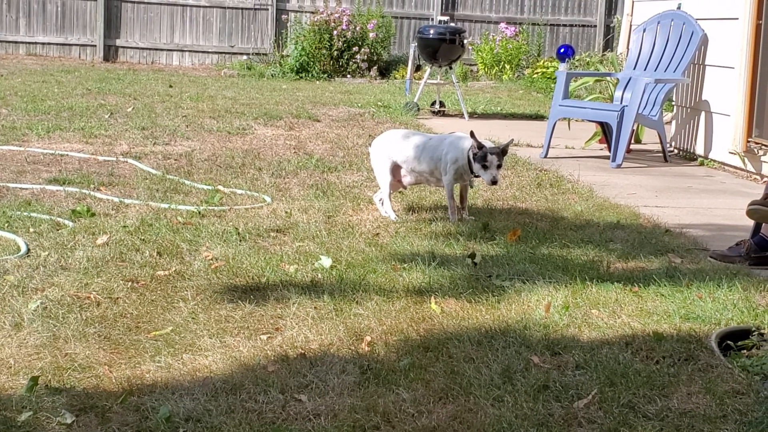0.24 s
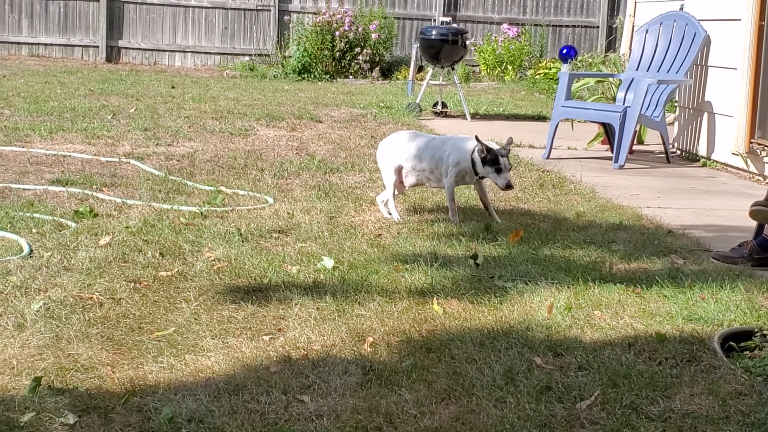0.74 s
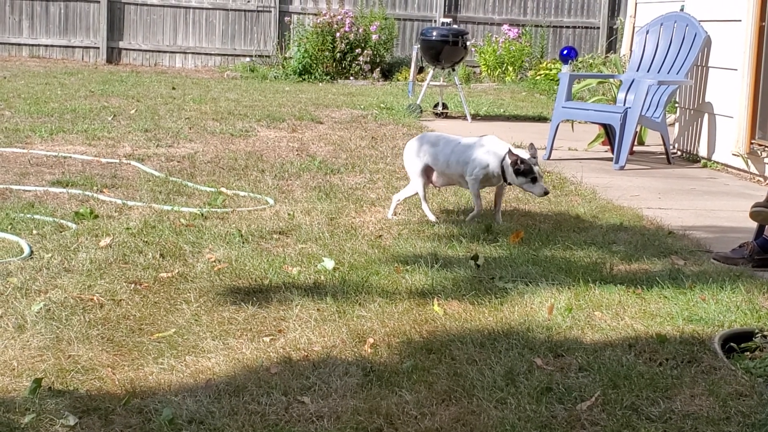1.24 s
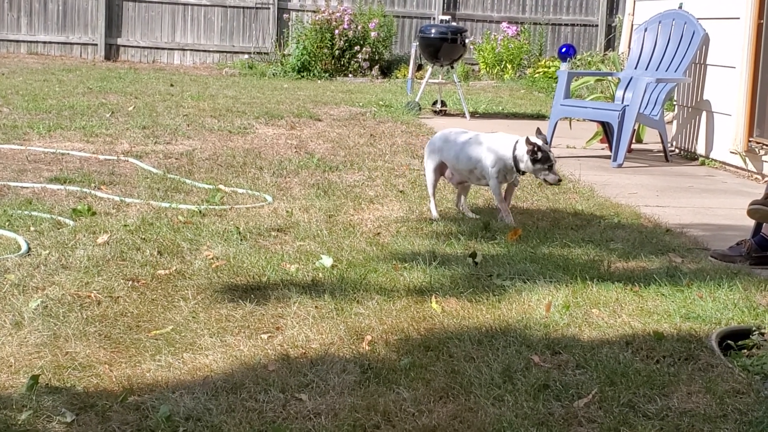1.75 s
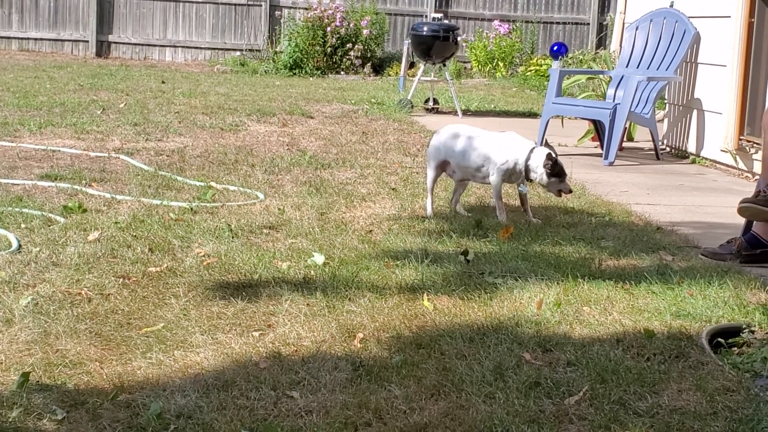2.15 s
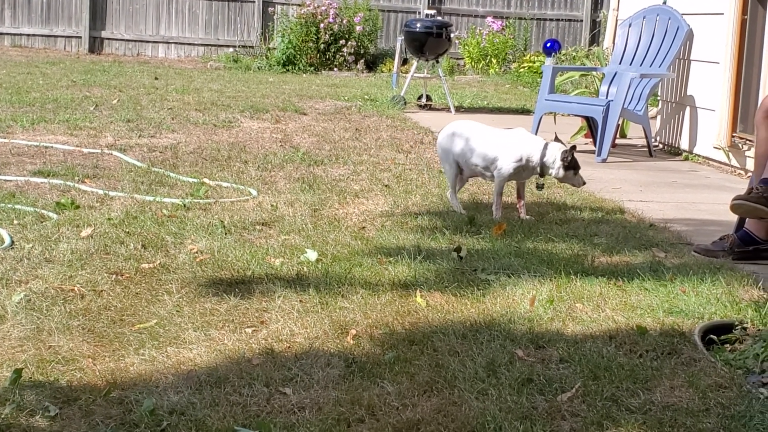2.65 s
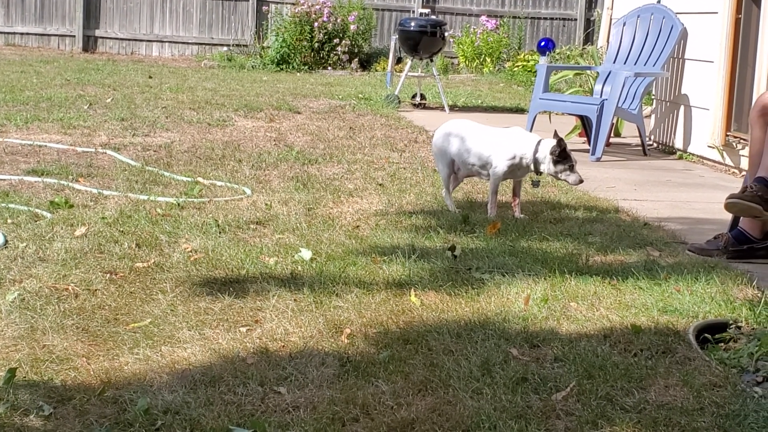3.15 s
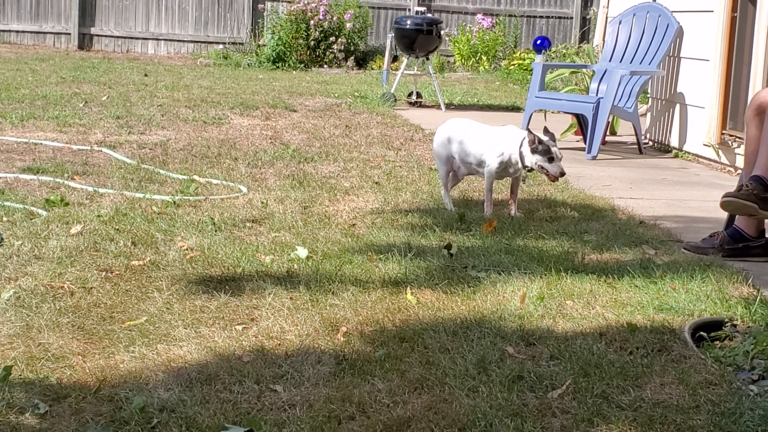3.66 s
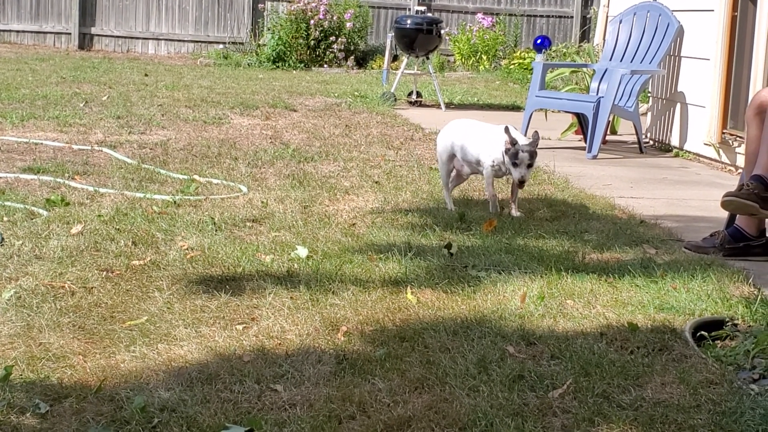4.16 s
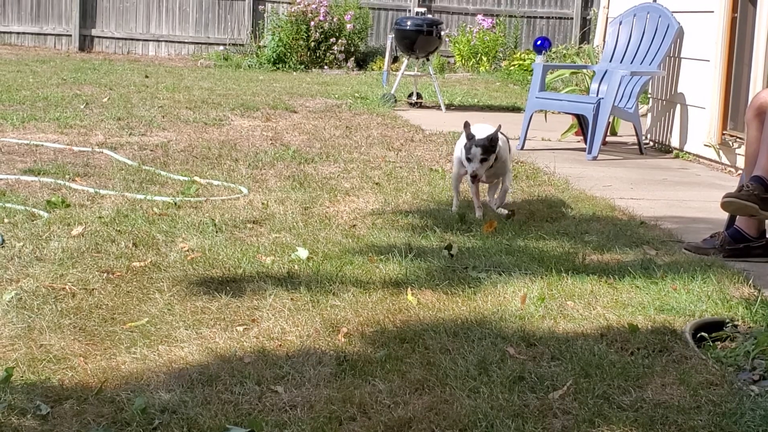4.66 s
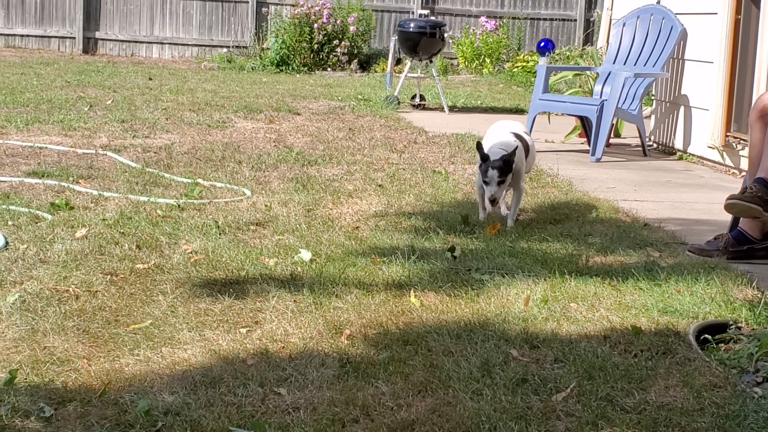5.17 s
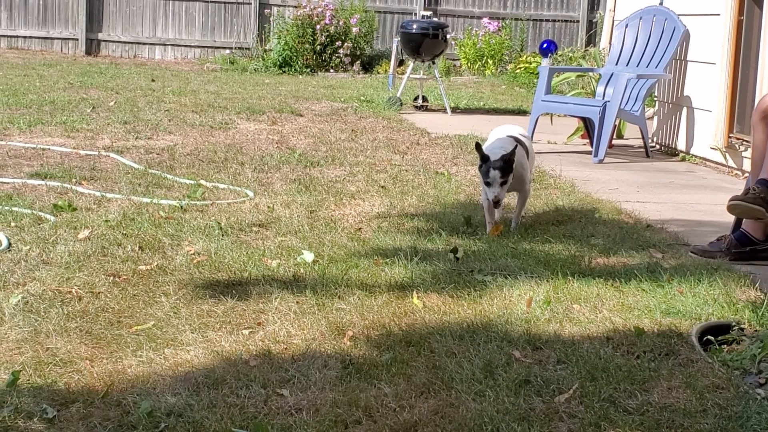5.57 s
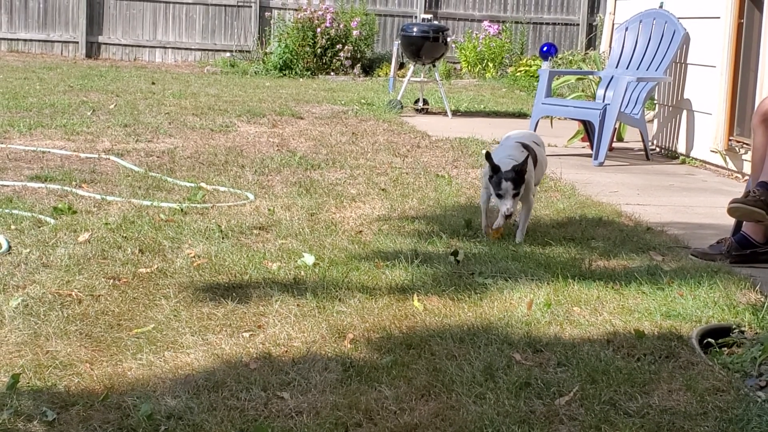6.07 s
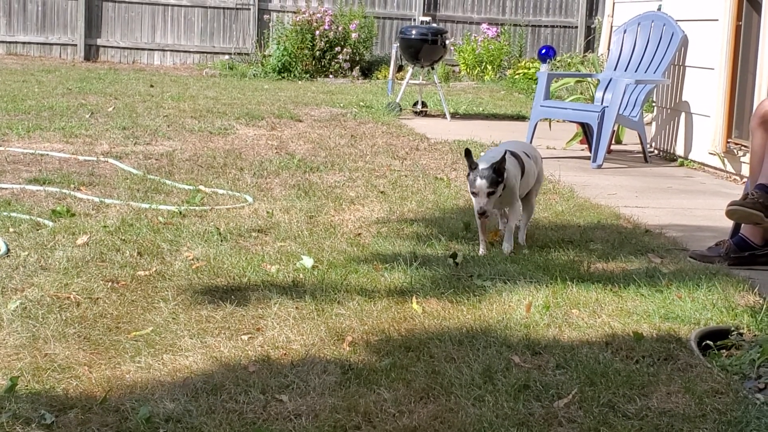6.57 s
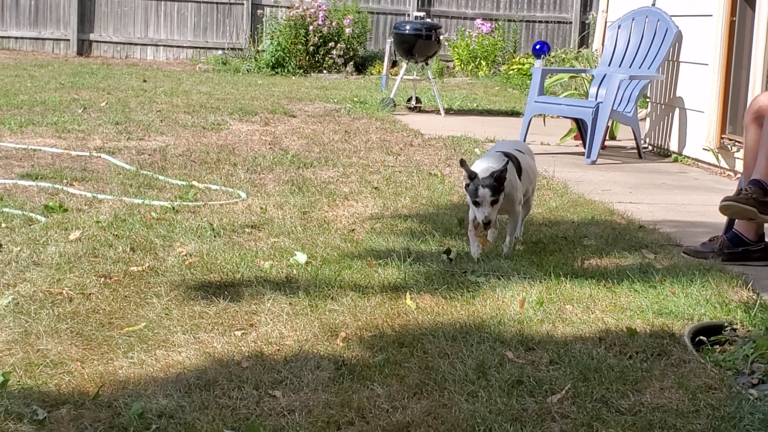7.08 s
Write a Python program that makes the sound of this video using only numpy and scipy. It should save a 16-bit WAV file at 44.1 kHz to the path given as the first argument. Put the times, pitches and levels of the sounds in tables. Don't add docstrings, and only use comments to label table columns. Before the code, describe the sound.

A heavy vehicle rumbles past behind a garden fence, deep engine drone sinking as tyre roar opens up, while a dog crackles through dry grass.

```python
import sys
import numpy as np
from scipy import signal
from scipy.fft import rfft, irfft, next_fast_len
from scipy.io import wavfile

SR = 44100
rng = np.random.default_rng(int(sys.argv[2]) if len(sys.argv) > 2 else 0)


def wav_out(sig):
    wavfile.write(sys.argv[1], SR, np.round(np.clip(np.atleast_2d(sig).T, -1, 1) * 32767).astype(np.int16))


def gain_from_decibels(decibels):
    exponent = np.asarray(decibels, float) / 20
    return 10 ** exponent


N = 322812

PASS_S, DISTANCE_M, SPEED_M_PER_S, SOUND_M_PER_S = 4.0, 25.0, 21.0, 343
CYCLE_HZ = 27.27
PIPE_SPREAD = 0.45
CLEAR_S, CLEAR_TAKES_S = 3.4, 0.047

ORDERS = [2, 4, 3, 5, 6, 7, 8, 12]
ORDER_LEVELS = [-30, -27.5, -34.5, -40, -50.5, -57.5, -56, -62.5]
# centre_s, gain_db, half_length_s
FIRING_ECHOES = [
    [(.3, 1, 0.13), (.85, 2.5, 0.077), (1.15, -2, 0.18), (2.0, -8.5, 0.31), (2.52, 7, 0.23),
     (2.82, -6, 0.51), (3.3, 1.5, 0.067), (3.65, 5, .25), (4.15, 4.5, 0.17), (4.4, -3, 0.085),
     (4.8, 7, 0.35), (5.36, -24, 0.14), (5.9, -7, 0.98), (6.9, -5, 0.072)],
    [(.15, -9.5, 0.2), (1.25, -6.5, 0.1), (1.55, -0.5, 0.095), (2.0, 2, 0.1), (2.42, 2.5, 0.062),
     (2.9, -9.5, 0.19), (3.45, -9, 0.2), (4.8, -5, .13), (5.35, -6, 0.34), (5.95, 6, 0.64),
     (6.55, -4.5, 0.25), (7.0, -14, 0.13), (7.32, -12, 0.091)],
]
# centre_s, gain_db, half_length_s
MINOR_ECHOES = [
    [(1.5, -6, 0.27), (2.45, -17, 0.31), (2.9, -15, 0.27), (3.25, -8, 0.077), (4.1, -1, 0.083),
     (4.6, -12, 0.16), (5.45, 6, .45), (6.6, -14, 0.069), (7.0, 3.5, 0.21)],
    [(.7, 0, 0.36), (1.8, -6.5, 0.65), (3.0, -13, 0.16), (3.52, -11, 0.16), (4.6, 4, 0.13),
     (5.45, -22, 0.26), (6.5, 0.5, 0.33), (7.25, 8.5, 0.17)],
    [(3.85, 2, 0.37), (4.4, 16.5, 0.19), (5.2, 15, 0.35), (5.8, 10, .2), (7.0, 10.5, .35)],
    [(2.3, 9, 0.22), (5.7, 12.5, 0.54)],
    [(.5, -8, .4), (1.6, 3, 0.52), (2.4, -5, .15), (3.95, 4, .15), (4.7, 2.5, 0.49), (6.0, 10, 0.81)],
    [(3.9, 6.5, 0.35), (4.45, 6, 0.23), (6.2, 14.5, 0.51)],
]

# frequency_hz, density_db (per Hz)
BOOM_COLOUR = [(20, -19), (32, -11.5), (45, 4.5), (68, 9), (95, 5), (130, 6), (165, -7.5), (230, -90.5)]
GROWL_COLOUR = [(380, -20), (480, -0.5), (560, 9), (680, 5.5), (800, -39), (1500, -86.5)]
PUFF_COLOUR = [(2800, -25), (3800, -9), (5000, -8), (5800, -20), (8000, -44)]
# centre_s, gain_db, half_length_s
GAP = (4.2, 2.5, .6)
# centre_s, level_db, half_length_s
PUFF = (3.58, -56, .045)

# frequency_hz, density_db (per Hz)
RUMBLE_COLOUR = [(120, -7), (170, 11.5), (220, 4), (280, 3), (330, 2), (430, -7), (600, -43), (1500, -90)]
TREAD_COLOUR = [(500, -62.5), (680, -9), (770, 0), (860, -0.5), (960, -16), (1500, -92)]
ROAR_COLOUR = [(330, -30.5), (440, -9), (560, -7), (700, 0), (830, 3.5), (1000, -1), (1300, 2.5),
               (1800, -2.5), (2200, -10), (2800, -68.5)]
HISS_COLOUR = [(1700, -5), (2200, 1), (3000, -1), (4500, -10), (6500, -13), (7800, -13.5), (8050, -15.5),
               (8400, -20), (9200, -35), (10000, -53.5)]
AIR_COLOUR = [(3500, -14.5), (5500, 5), (8100, 6.5), (9200, -2.5), (10500, -2), (12000, -3), (13500, -5.5),
              (15500, -11)]
# time_s, level_db
TYRES = [(0, -51.5), (.7, -53), (1.45, -54), (2.4, -51), (3.3, -48.5), (4.1, -45.5), (4.7, -46),
         (5.2, -44.5), (5.9, -45), (6.7, -43.5), (7.32, -43.5)]
# centre_s, gain_db, half_length_s
SIGHT = (4.9, 2.5, .7)

# level_db (at the nearest point), nearness_share, tyre_swing_share, step_db (on clearing the house)
BOOM_RULE = (-39.5, 0.2, 0.46, 1.5)
GROWL_RULE = (-52.5, 1.5, -0.74, 1.5)
RUMBLE_RULE = (-53, 0.33, 0.2, 6)
TREAD_RULE = (-49.5, 0.8, 0.7, -1.8)
ROAR_RULE = (-42, .01, 0.795, -0.25)
HISS_RULE = (-49.5, 0.1927, 0.61, 1)
AIR_RULE = (-70.5, 0.7, .6, 3.2)

# loudest_s, level_db, rise_s, fall_s
STEPS = [(1.42, -72, .03, .03), (1.48, -63.5, .04, 0.022), (1.86, -76, 0.022, .02),
         (4.191, -54, .005, .014), (5.65, -60, 0.034, 0.045), (5.71, -73.5, 0.012, .015),
         (6.16, -66, 0.005, 0.011), (6.331, -67, 0.009, 0.028), (6.375, -56, 0.018, 0.038),
         (6.48, -62.5, .02, .03), (6.55, -65, 0.035, 0.016), (6.885, -59, 0.0086, 0.021),
         (6.91, -57, 0.011, 0.041), (7.02, -68, 0.025, 0.031), (7.244, -50.5, 0.022, 0.016),
         (7.315, -63, .015, 0.029)]
# frequency_hz, density_db (per Hz)
GRASS_COLOUR = [(3000, -13.5), (5500, -1), (7500, 7.5), (8700, 5.5), (10000, 2), (13000, 1), (16000, -2.5)]
# start_s, peak_db, pitch_hz
SNAPS = [(1.6003, -60, 9600), (1.8442, -65, 9100), (4.1904, -45, 14500), (6.1579, -50, 10110),
         (6.32, -59, 9700), (6.369, -40, 9900), (6.4757, -57, 12500), (6.8803, -48, 12800),
         (7.244, -39, 12000)]
# pitch_hz, level_db, t60_s
TAG = [(11030, -70, .11), (11190, -72, .09), (14400, -72, .06)]
TAG_S = 5.5

# frequency_hz, density_db (per Hz)
INSECTS_COLOUR = [(3800, -34), (4900, 3.5), (5600, -13), (7600, -27.5), (8000, 1.5), (8300, -16.5),
                  (8800, -44.5)]
SELF_HISS_COLOUR = [(7000, -29.5), (9200, -3), (11500, 0), (11950, 3.5), (12400, 0), (16000, -2)]

# frequency_hz, likeness (0-1), left_minus_right_db
PORTS = [(61, 0.7, -1), (289, .95, -1), (423, 0.41, -1), (496, 0.63, 2.5), (820, 0.6, -1.5),
         (1150, 0.62, 0.5), (1410, 0.2, -0.5), (1950, 0.45, -2), (2620, 0.13, 2), (4170, 0.2, -6.5),
         (7040, 0, 0.5), (8800, 0.3, 5.5), (9500, 0.05, -0.5), (15800, 0.06, 7)]
# frequency_hz, likeness (0-1), left_minus_right_db
GRASS_PORTS = [(3000, .3, -1.5), (8000, 0.1, 0), (15000, 0.4, 4)]
RIGHT_LATE_S, LATE_FROM_HZ = 0.00046, 626


def engine(waver=0.15, flutter_db=1.0):
    near_db, doppler = passing()
    angle = 2 * np.pi * np.cumsum(CYCLE_HZ * doppler) / SR
    out = np.zeros((2, N))
    for order, order_db, echoes in zip(ORDERS, ORDER_LEVELS, FIRING_ECHOES + MINOR_ECHOES):
        phase = order * angle + PIPE_SPREAD * order ** 2 + waver * drift(3.5)
        skew = 0.0091 * order * drift(0.18)
        lean_db = 0.4 + 0.1 * drift(0.75)
        level_db = order_db + near_db + swells_db(echoes) + flutter_db * drift(17.0)
        gain = np.sqrt(2) * gain_from_decibels(level_db + np.array([lean_db, -lean_db]))
        out += gain * np.cos([phase + skew, phase - skew])
    return out


def exhaust():
    gap_db = swells_db([GAP])
    puff_s, puff_db, half_s = PUFF
    puff = gain_from_decibels(puff_db) * np.exp(-((np.arange(N) / SR - puff_s) / half_s) ** 2)
    boom = gain_from_decibels(follow_db(*BOOM_RULE) + gap_db) * noise(BOOM_COLOUR)
    growl = gain_from_decibels(follow_db(*GROWL_RULE) + 0.5 * gap_db) * noise(GROWL_COLOUR)
    return boom + growl + puff * noise(PUFF_COLOUR)


def road():
    rumble = flickering(RUMBLE_COLOUR, follow_db(*RUMBLE_RULE), 1.2)
    tread = flickering(TREAD_COLOUR, follow_db(*TREAD_RULE), 1.5)
    roar = flickering(ROAR_COLOUR, follow_db(*ROAR_RULE), 0.5)
    hiss = flickering(HISS_COLOUR, follow_db(*HISS_RULE), 0.5)
    air = flickering(AIR_COLOUR, follow_db(*AIR_RULE) + swells_db([SIGHT]), 0.6)
    return rumble + tread + roar + hiss + air


def grass(per_s=2500, spread_db=1.0):
    t = np.arange(0, N / SR, 0.0005)
    press = np.zeros(len(t))
    for loudest_s, db, rise_s, fall_s in STEPS:
        slope = np.where(t < loudest_s, (t - loudest_s) / rise_s, (loudest_s - t) / fall_s)
        press += gain_from_decibels(db) * np.exp(slope.clip(-40))
    press = np.interp(np.arange(N) / SR, t, press)
    struck = rng.random((3, N)) < per_s / SR
    strength = gain_from_decibels(spread_db * rng.exponential(1, (3, N)).clip(0, 5))
    crackles = struck * strength * rng.choice([-1, 1], (3, N))
    return press * gain_from_decibels(2.7 * drift(60.0)) * at_ports(GRASS_COLOUR, crackles, GRASS_PORTS)


def snaps(t60=0.0027, low_hz=7800, high_hz=13500):
    out = np.zeros(N)
    for start_s, db, pitch_hz in SNAPS:
        out += ring(start_s + 0.001, pitch_hz, db, t60)
        out += ring(start_s + 0.00032, low_hz, db - 4, t60)
        out += ring(start_s + 0.001, high_hz, db - 13, t60)
    for mode in TAG:
        out += ring(TAG_S, *mode)
    return out * gain_from_decibels([[1.5], [-1.5]])


def background():
    return flickering(INSECTS_COLOUR, -72.5, 0.8) + flickering(SELF_HISS_COLOUR, -80.5, 0.2)


def passing():
    along_m = SPEED_M_PER_S * (np.arange(N) / SR - PASS_S)
    away_m = np.hypot(along_m, DISTANCE_M)
    near_db = 20 * np.log10(DISTANCE_M / away_m)
    return near_db, 1 - SPEED_M_PER_S * along_m / away_m / SOUND_M_PER_S


def follow_db(db, near_share, tyre_share, clear_db):
    t = np.arange(N) / SR
    tyres_db = np.interp(t, *np.transpose(TYRES))
    clear = 0.5 + 0.5 * np.tanh((t - CLEAR_S) / CLEAR_TAKES_S)
    return db + near_share * passing()[0] + tyre_share * (tyres_db - tyres_db.mean()) + clear_db * clear


def swells_db(rows):
    t = np.arange(0, N / SR + 0.01, 0.005)
    total_db = sum(db * np.exp(-((t - s) / half_s) ** 2) for s, db, half_s in rows)
    return np.interp(np.arange(N) / SR, t, total_db)


def flickering(colour, db, flicker_db):
    return gain_from_decibels(db + flicker_db * drift(1.43)) * noise(colour)


def noise(colour):
    return at_ports(colour, rng.standard_normal((3, N)))


def at_ports(colour, sources, ports=PORTS):
    size = next_fast_len(N)
    hz = np.arange(size // 2 + 1) * SR / size
    shared, left, right = rfft(sources, size) * gain_from_decibels(over_hz(colour, size)[0])
    alike, lean_db = over_hz(ports, size)
    alike = np.clip(alike, 0, 1)
    late_s = RIGHT_LATE_S * hz ** 2 / (hz ** 2 + LATE_FROM_HZ ** 2)
    late = np.exp(-2j * np.pi * hz * late_s)
    left = (np.sqrt(alike) * shared + np.sqrt(1 - alike) * left) * gain_from_decibels(lean_db / 2)
    right = (np.sqrt(alike) * shared * late + np.sqrt(1 - alike) * right) * gain_from_decibels(-lean_db / 2)
    return rms_one(irfft(np.array([left, right]), size)[:, :N])


def over_hz(points, size):
    hz, *columns = np.transpose(points)
    bins = np.log(np.arange(size // 2 + 1) * SR / size + 1)
    return [np.interp(bins, np.log(hz), column) for column in columns]


def ring(at_s, hz, db, t60):
    out, start = np.zeros(N), int(at_s * SR)
    t = np.arange(min(N - start, int(2 * t60 * SR))) / SR
    out[start:start + len(t)] = gain_from_decibels(db - 60 * t / t60) * np.sin(2 * np.pi * hz * t)
    return out


def drift(rate_hz):
    r = np.exp(-2 * np.pi * rate_hz * 40 / SR)
    chance = rng.standard_normal(N // 40 + 2002)
    slow = signal.lfilter([1], [1, -2 * r, r * r], chance)[2000:]
    return np.interp(np.arange(N) / 40, np.arange(len(slow)), rms_one(slow))


def rms_one(x):
    return x / np.sqrt(np.mean(x ** 2) + 1e-20)


def scene():
    return engine() + exhaust() + road() + grass() + snaps() + background()


def roll_off(x):
    return signal.sosfilt(signal.butter(12, 16010, fs=SR, output="sos"), x)


def record(dry):
    top_cut = signal.ellip(14, 0.3, 70, 15720, fs=SR, output="sos")
    mix = signal.sosfilt(top_cut, dry)
    return roll_off(mix)


dry = scene()
out = record(dry)
wav_out(out)
```